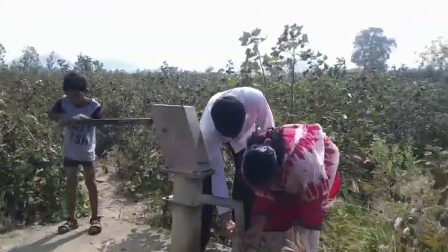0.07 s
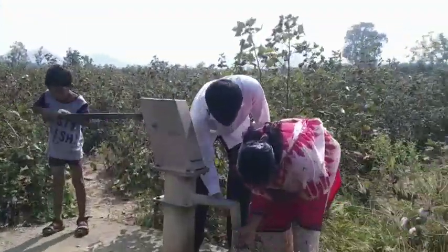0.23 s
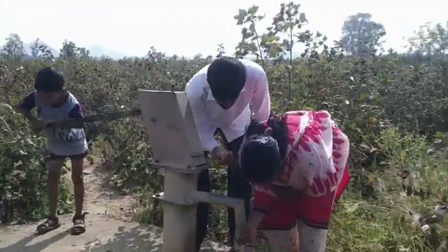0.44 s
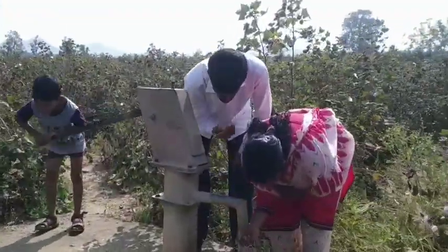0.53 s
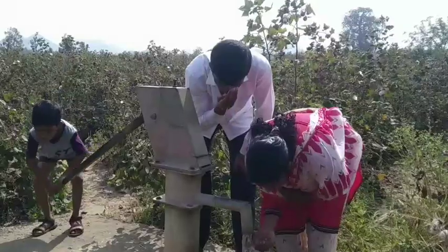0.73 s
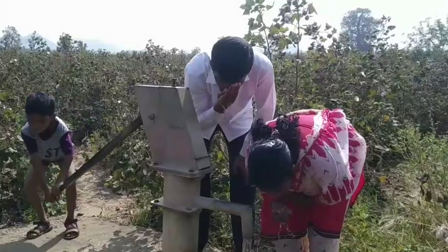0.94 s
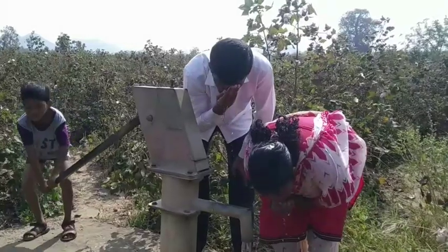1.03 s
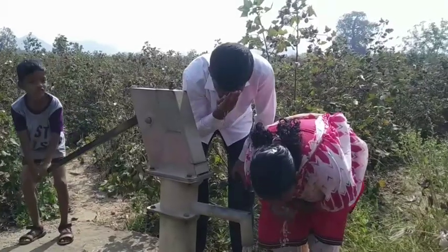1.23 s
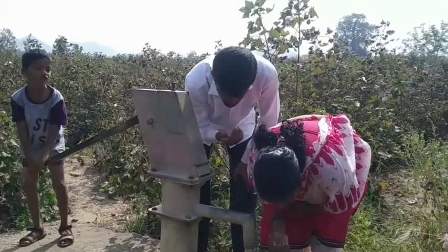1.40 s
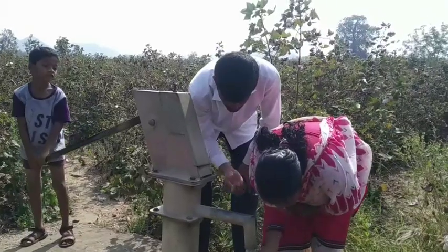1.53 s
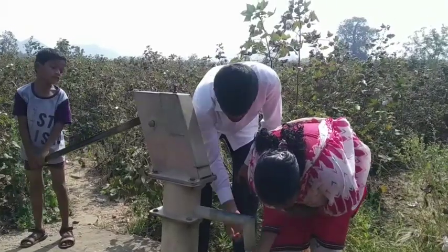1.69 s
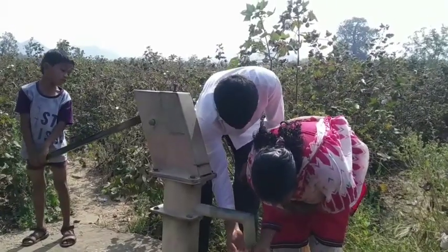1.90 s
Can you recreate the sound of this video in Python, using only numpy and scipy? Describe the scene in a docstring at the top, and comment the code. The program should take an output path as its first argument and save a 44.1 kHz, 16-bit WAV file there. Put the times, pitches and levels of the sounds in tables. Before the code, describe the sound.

Water spatters from a steel hand pump onto concrete and hands throughout, in uneven splats. The lever knocks lightly at 0.3 and 0.6 seconds, clacks sharply at 0.7, then hits its stop with a loud rattling clank from 0.8 to 0.9. Splashing continues, with small plinks from 1.7 seconds. The pump rings faintly underneath, and light wind puffs on the microphone early on.

```python
"""Water spatters on concrete and hands as it runs from the spout of a steel hand pump in a field.
Drops burst on impact and trap small bubbles that ring. The lever knocks on its way down, then hits
its stop with a rattling clank that rings the pump head, which also hums with the water rushing through.
A light wind puffs on the two microphone ports over faint noise and the head's steady 660 Hz ring."""
import sys
import numpy as np
from scipy import signal
from scipy.fft import rfft, irfft, next_fast_len
from scipy.io import wavfile
from scipy.ndimage import map_coordinates

SR = 44100
rng = np.random.default_rng(int(sys.argv[2]) if len(sys.argv) > 2 else 0)


def to_wav(sig):
    """Store sig (one row per channel, or 1-D mono) as 16-bit WAV at the path in sys.argv[1].

    Samples outside -1..1 are clipped; the rate is SR.
    """
    pcm = np.clip(np.atleast_2d(sig), -1, 1) * 32767
    pcm = np.round(pcm).astype(np.int16)
    wavfile.write(sys.argv[1], SR, pcm.T)  # frames by channels


N = 85995


def amp(db):
    return 10 ** (np.asarray(db) / 20)


def unit_rms(x):
    return x / np.sqrt(np.mean(x ** 2) + 1e-20)


def at_hz(rows, hz):
    """Interpolate (f/Hz, value) rows on a log axis."""
    f, value = np.transpose(rows)
    return np.interp(np.log(hz + 1), np.log(f + 1), value)


def curve(rows):
    """Interpolate (t/s, value) rows per sample."""
    return np.interp(np.arange(N) / SR, *np.transpose(rows))


def wobble(knots_per_s):
    """Smooth random curve."""
    return map_coordinates(rng.standard_normal(2000), [np.arange(N) * knots_per_s / SR], mode="wrap")


def decay(t, t60):
    return np.exp(-np.log(1000) * t / t60)


def filtered(x, response):
    n = x.shape[-1]
    size = next_fast_len(n + 4096)
    return irfft(rfft(x, size) * response(np.fft.rfftfreq(size, 1 / SR)), size)[..., :n]


def coloured(x, spectrum):
    """Shape x by (f/Hz, level/dB) rows; rms 1."""
    return unit_rms(filtered(x, lambda hz: amp(at_hz(spectrum, hz))))


def bump(hz, centre_hz, octaves):
    """Broad resonance on a log axis."""
    return np.exp(-.5 * (np.log2((hz + 1) / centre_hz) / octaves) ** 2)


def add(track, start_s, x):
    start = max(0, round(start_s * SR))
    n = min(x.shape[-1], N - start)
    track[..., start:start + n] += x[..., :n]


def ping(db, hz, t60):
    """Damped sine with a quick rise."""
    t = np.arange(SR // 20) / SR
    return amp(db) * np.sin(2 * np.pi * hz * t) * decay(t, t60) * (1 - np.exp(-2 * hz * t))


# lever and linkage contacts: t/s, level/dB, centre f/Hz, clatter t60/s
LEVER_BLOWS = [(.295, -37, 800, .3), (.636, -27.5, 560, .14), (.811, -20, 1800, .2), (.812, -27, 210, .12),
               (.824, -18, 720, .12), (.834, -22, 170, .12), (.853, -22, 3500, .2), (.867, -23, 900, .2),
               (.886, -17, 2200, .15), (.904, -21, 3500, .08), (1.053, -39, 800, .4)]
# pump head modes: f/Hz, level/dB, t60/s
HEAD_MODES = [(144, -3, .3), (179, -8, .4), (199, -8, .7), (242, -2, .35), (315, -12, .55), (557, -7, .22),
              (670, -13, .33), (894, -14, .25), (1232, -7, .25), (1307, -8, .22), (1440, -1, .2),
              (1624, -9, .26), (2249, -8, .26), (2393, -4, .22), (2899, -4, .25)]
# steel casing: f/Hz, level/dB
CASING_SPECTRUM = [(50, 0), (150, 4.5), (235, -13), (320, -4), (600, 3), (820, 5), (1020, -5), (1300, 4),
                   (1800, 1.5), (2700, 6.5), (3900, -3), (4600, 5.5), (9000, 5), (15000, -21)]


def lever_blows(ring_db=-5.5, shimmer_db=-19.5, shimmer_t60_s=.66, rise_s=.00091):
    """Each contact clatters in the casing and rings the head modes that its hardness reaches."""
    out, t = np.zeros((2, N)), np.arange(int(SR * .8)) / SR
    mode_hz, mode_db, mode_t60 = np.transpose(HEAD_MODES)[:, :, None]
    modes = np.exp(2j * np.pi * mode_hz * t) * decay(t, mode_t60)
    shimmer = amp(shimmer_db) * decay(t, shimmer_t60_s)  # dense weak modes
    for start_s, db, centre_hz, t60 in LEVER_BLOWS:
        colour = lambda hz: bump(hz, centre_hz, octaves=1) * amp(at_hz(CASING_SPECTRUM, hz))
        steel = unit_rms(filtered(rng.standard_normal((2, len(t))), colour))
        clatter = steel * (decay(t, t60) + shimmer)
        strengths = (amp(mode_db + ring_db) * bump(mode_hz, centre_hz, octaves=2)).T
        phases = np.exp(2j * np.pi * rng.random((2, len(HEAD_MODES))))
        ring = ((strengths * phases) @ modes).real
        add(out, start_s, amp(db) * (clatter + ring) * (1 - np.exp(-t / rise_s)))
    return out


# clacks: t/s, level/dB, f/Hz, t60/s
LINKAGE_CLACKS = [(0.255, -20.5, 1490, 0.0039), (0.6954, -1, 1970, 0.0029), (0.699, -15, 1390, 0.017)]


def linkage_clacks():
    """The linkage clacks, one dry ring each."""
    out = np.zeros(N)
    for start_s, db, hz, t60 in LINKAGE_CLACKS:
        add(out, start_s, ping(db, hz, t60))
    return out


# splats: t/s, level/dB
CONCRETE_SPLATS = [(.008, -31.5), (0.151, -29), (0.241, -21.5), (0.266, -33), (0.418, -28.5),
                   (0.428, -27.5), (0.51, -27), (0.545, -30), (.555, -23.5), (.613, -27), (0.69, -21),
                   (.751, -23), (.787, -31), (1.159, -20.5), (1.19, -25), (1.218, -30), (1.341, -26),
                   (1.386, -24), (1.488, -23.5), (1.505, -31.5), (1.545, -25.5), (1.626, -28.5),
                   (1.654, -22), (1.747, -32), (1.864, -32), (1.932, -24)]
# drop impact: f/Hz, level/dB
DROP_SPECTRUM = [(300, -29.5), (1500, -43.5), (2800, -15), (3800, -19.5), (4600, -11.5), (7200, -12),
                 (8400, -4), (9400, -4), (10500, -17), (13000, -18.5), (15800, -33.5)]


def splats(rise_s=.001, t60_s=.022, tick_hz=8440, tick_db=16.5, tick_t60_s=.0036):
    """A lump of water bursts into droplets on the concrete and traps one tiny, ticking bubble."""
    bursts, ticks = np.zeros((2, 2, N))
    t, lead_s = np.arange(SR // 20) / SR, .01
    envelope = np.where(t < lead_s, np.exp(-abs(t - lead_s) / rise_s), decay(t - lead_s, t60_s))
    for start_s, db in CONCRETE_SPLATS:
        hiss = rng.standard_normal((2, len(t)))
        sizes = np.exp(.7 * np.clip(rng.standard_normal(len(t)), -2, 2))
        add(bursts, start_s - lead_s, amp(db) * unit_rms(hiss * sizes) * envelope)
        cycles = tick_hz * np.exp(.064 * rng.standard_normal()) * t
        tone = np.sin(2 * np.pi * (cycles + rng.random((2, 1))))
        add(ticks, start_s, amp(db + tick_db) * tone * decay(t, tick_t60_s) * (1 - np.exp(-cycles / 2)))
    return filtered(bursts, lambda hz: unit_rms(amp(at_hz(DROP_SPECTRUM, hz)))) + ticks


def patter(spectrum, spread_db, drops_per_s=1800):
    """Random drop impacts of uneven size; rms 1."""
    sizes = amp(spread_db * np.minimum(rng.standard_normal(N), 2))
    hits = rng.random(N) < drops_per_s / SR
    return coloured(sizes * hits * rng.standard_normal((2, N)), spectrum)


BUBBLE_HZ, BUBBLE_DECAY_CYCLES = 2908, 14.3


def bubbles(per_s, centre_hz, log_spread):
    """Trapped bubbles ring briefly, rising in pitch; rms 1."""
    out, t = np.zeros((2, N)), np.arange(SR // 40) / SR
    draws = rng.uniform(-1, 1, (2000, 4))
    for when, pitch, *channel_gains in draws[:int(per_s * N / SR)]:
        cycles = centre_hz * np.exp(log_spread * pitch) * t
        age = cycles / BUBBLE_DECAY_CYCLES
        chirp = np.sin(2 * np.pi * cycles * (1 + .044 * age)) * np.exp(-age)
        add(out, abs(when) * N / SR, np.outer(channel_gains, chirp))
    return unit_rms(out)


# spray envelope: t/s, level/dB
SPRAY_LEVEL = [(0, -45), (.13, -52), (.17, -43.5), (.25, -28), (.33, -38), (.41, -38), (.53, -33.5),
               (.66, -41), (.71, -29), (.80, -47), (.82, -24.5), (.90, -21), (.95, -32.5), (1.1, -33.5),
               (1.24, -35), (1.32, -41), (1.42, -33), (1.63, -42), (1.68, -33.5), (1.95, -37)]


def spray(flutter_db=2.5):
    """Fine drops patter among the pings of tiny bubbles."""
    drops = patter(DROP_SPECTRUM, spread_db=3)
    fizz = amp(-11) * bubbles(per_s=96, centre_hz=8120, log_spread=.265)
    return amp(curve(SPRAY_LEVEL) + flutter_db * wobble(60)) * (drops + fizz)


# gush envelope: t/s, level/dB
GUSH_LEVEL = [(0, -47.5), (.14, -54), (.23, -48.5), (.31, -38), (.39, -43), (.46, -38), (.53, -50.5),
              (.73, -37), (.79, -67), (.95, -37.5), (1.12, -39), (1.25, -44.5), (1.33, -53.5),
              (1.42, -47.5), (1.61, -58.5), (1.68, -49), (1.95, -53.5)]
# stream impact: f/Hz, level/dB
STREAM_SPECTRUM = [(100, -0.5), (200, -3), (450, -13), (800, -5.5), (1100, -6.5), (2900, 1), (3800, -9.5),
                   (5000, -6.5), (9000, -15.5)]


def gush(flutter_db=1):
    """The stream lands with a lower patter and larger bubbles."""
    drops = patter(STREAM_SPECTRUM, spread_db=-2.5)
    burble = amp(-10) * bubbles(per_s=97, centre_hz=BUBBLE_HZ, log_spread=.242)
    return amp(curve(GUSH_LEVEL) + flutter_db * wobble(60.33)) * (drops + burble)


# slaps: t/s, level/dB, t60/s
WATER_SLAPS = [(0.291, -29.5, 0.4), (0.458, -27.5, 0.019), (1.189, -26.5, 0.012), (1.398, -32, 0.1),
               (1.49, -38.5, 0.051), (1.551, -32.5, 0.011), (1.663, -31.5, 0.046)]


def slaps(centre_hz=3030):
    """Water landing on hands or in the puddle sounds lower than on concrete."""
    out, t = np.zeros((2, N)), np.arange(SR // 5) / SR
    for start_s, db, t60 in WATER_SLAPS:
        grains = rng.standard_normal((2, len(t))) * np.exp(.43 * rng.standard_normal(len(t)))
        splash = unit_rms(filtered(grains, lambda hz: bump(hz, centre_hz, octaves=.67)))
        add(out, start_s, amp(db) * splash * decay(t, t60))
    return out


# plinks: t/s, level/dB
PUDDLE_PLINKS = [(1.664, -29), (1.717, -32), (1.871, -34)]


def puddle_plinks():
    """Single bubbles ring in the puddle at a clear pitch."""
    out = np.zeros(N)
    t60 = np.log(1000) * BUBBLE_DECAY_CYCLES / BUBBLE_HZ
    for start_s, db in PUDDLE_PLINKS:
        add(out, start_s, ping(db, BUBBLE_HZ, t60))
    return out


def scattered(direct, tail_db=-8, t60_s=.04):
    """Hard surfaces around the spout add a short tail."""
    t = np.arange(SR // 10) / SR
    tail = rng.standard_normal((2, len(t))) * decay(t, t60_s)
    tail /= np.linalg.norm(tail[0])
    return direct + amp(tail_db) * signal.fftconvolve(direct, tail, axes=1)[:, :N]


# hum envelope: t/s, level/dB
HUM_LEVEL = [(0, -57.5), (.8, -52.5), (1.3, -56), (1.95, -71.5)]


def head_hum(width_hz=11.2, centre_hz=375):
    """Water rushing through the head stirs its low, long-lived modes."""
    def resonances(hz):
        return sum(t60 ** 2 / (1 + 2j * (hz - mode_hz) / width_hz) * bump(mode_hz, centre_hz, octaves=1)
                   for mode_hz, _, t60 in HEAD_MODES)
    return amp(curve(HUM_LEVEL)) * unit_rms(filtered(rng.standard_normal((2, N)), resonances))


# puffs: t/s, level/dB
WIND_PUFFS = [(0.096, -37), (.34, -47), (.6, -46)]
# wind rumble: f/Hz, level/dB
WIND_SPECTRUM = [(15, 7), (45, 7), (120, -9.5), (300, -25.5), (1000, -55)]


def wind(breeze_db=-56.5, puff_s=.07):
    """A breeze and its puffs rumble on the ports, stronger on the right."""
    shared, left_only = coloured(rng.standard_normal((2, N)), WIND_SPECTRUM)
    t = np.arange(N) / SR
    puffs = sum(amp(db) * np.exp(-((t - peak_s) / puff_s) ** 2) for peak_s, db in WIND_PUFFS)
    return (amp(breeze_db) + puffs) * np.array([.16 * shared + .83 * left_only, 1.45 * shared])


# noise floor and head ring: f/Hz, level/dB
FLOOR_AND_RING_SPECTRUM = [(40, 22), (400, -14.5), (660, 27), (1000, -3.5), (15000, -7)]


def floor_and_ring(level_db=-61):
    """Faint background noise with the pump head's steady 660 Hz ring."""
    return amp(level_db) * coloured(rng.standard_normal((2, N)), FLOOR_AND_RING_SPECTRUM)


# left-right likeness: f/Hz, correlation
PORT_CORRELATION = [(250, 1), (700, 1), (1500, 0.067), (15000, 0.032)]
# left over right: f/Hz, level/dB
PORT_BALANCE = [(200, 0.5), (400, 2.3), (2400, -3), (4400, 0), (8200, -1.5), (14000, -4)]


def microphone_ports(pair, left_lag_s=.00017):
    """Two unrelated signals become left and right: alike in the bass, the left slightly late."""
    def mid_side_gains(hz):
        angle = np.arccos(np.clip(at_hz(PORT_CORRELATION, hz), -1, 1)) / 2
        return np.array([np.cos(angle), np.sin(angle)])

    def left_right_gains(hz):
        left = amp(at_hz(PORT_BALANCE, hz) / 2) * np.exp(-1j * np.pi * hz * left_lag_s)
        return np.array([left, 1 / left])

    mid, side = filtered(pair, mid_side_gains)
    return filtered(np.array([mid + side, mid - side]), left_right_gains)


def scene():
    pump = lever_blows() + head_hum()
    water = scattered(spray() + gush() + splats() + slaps())
    return microphone_ports(pump + water + floor_and_ring()) + linkage_clacks() + puddle_plinks() + wind()


def record(dry):
    """Brick-wall low-pass at 15.9 kHz."""
    return filtered(dry, lambda hz: hz < 15900)


dry = scene()
out = record(dry)
to_wav(out)
```